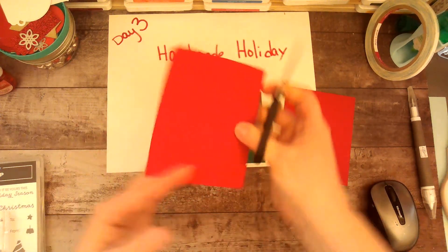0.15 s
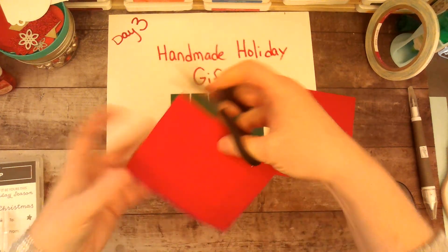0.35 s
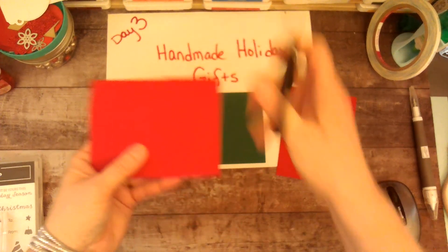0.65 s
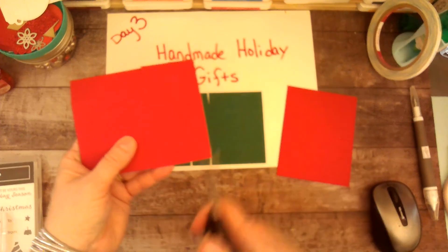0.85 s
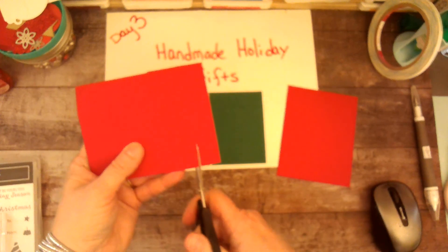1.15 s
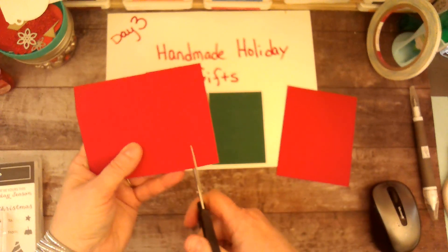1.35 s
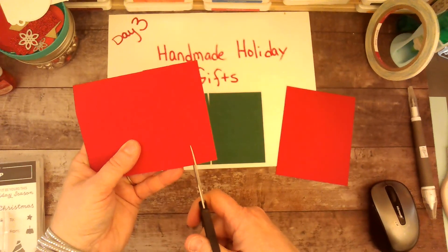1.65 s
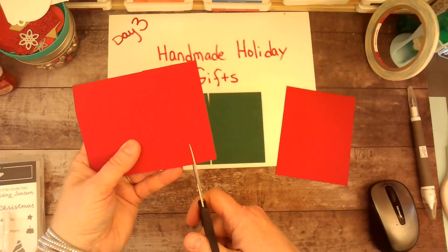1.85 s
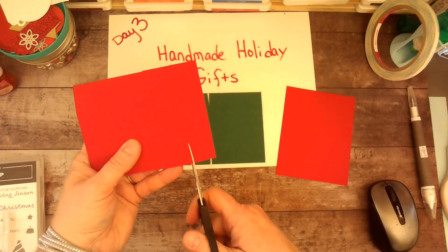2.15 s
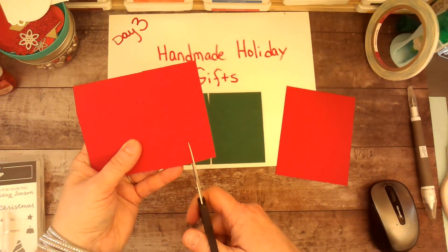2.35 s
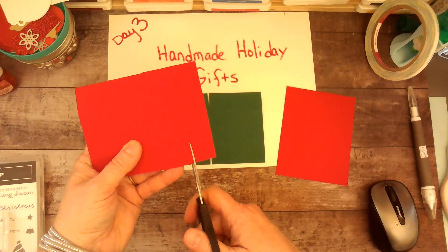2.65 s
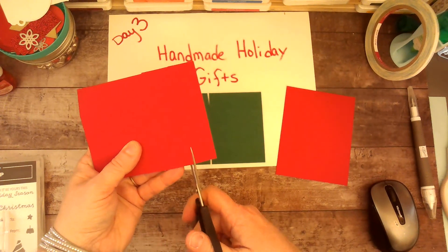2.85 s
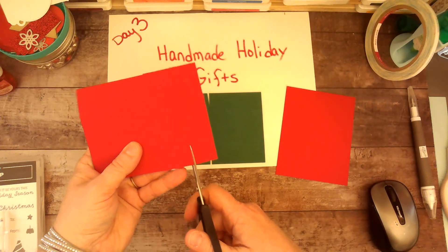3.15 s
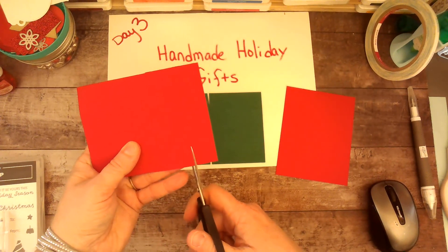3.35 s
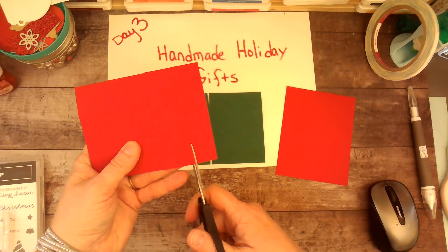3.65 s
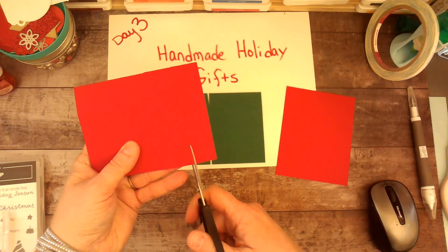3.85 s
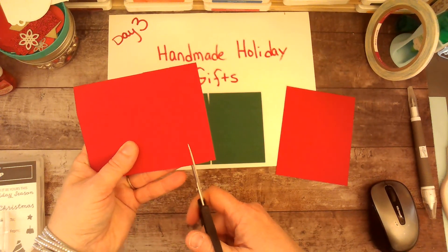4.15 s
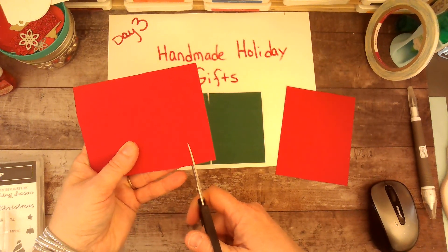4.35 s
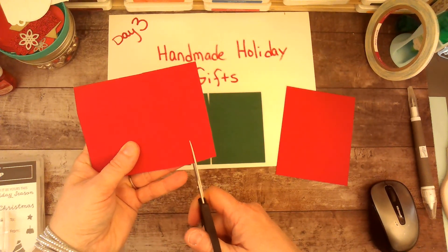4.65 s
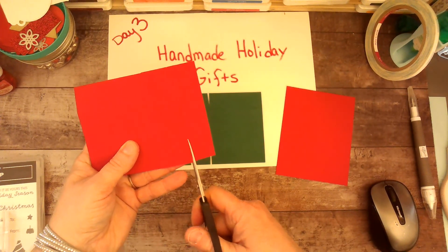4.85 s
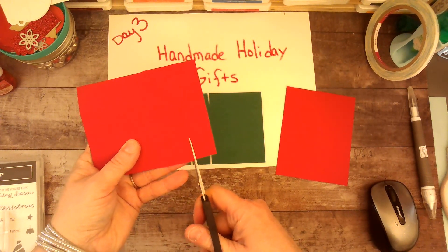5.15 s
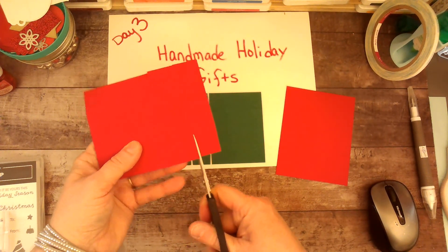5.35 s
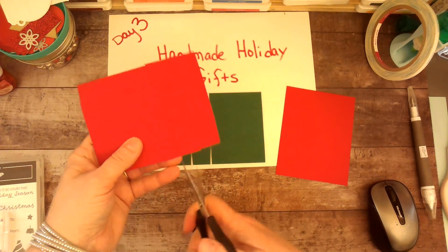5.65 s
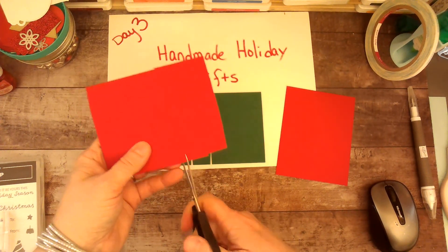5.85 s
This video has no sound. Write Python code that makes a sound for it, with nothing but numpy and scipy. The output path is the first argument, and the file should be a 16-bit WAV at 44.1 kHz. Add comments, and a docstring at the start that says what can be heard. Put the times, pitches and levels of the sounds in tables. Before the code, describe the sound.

Small scissors and stiff card are handled close to the microphone in a small, quiet room, with a low throbbing rumble, soft hiss and a very faint thin whine throughout. In the first 0.7 seconds the card brushes and slides under fingers, the scissors tick twice and bump the sheet. Faint, rapid, even ticks of a small focus motor run from about 0.3 to 1.7 seconds. The card creaks softly at 1.5 seconds. Only faint rubs follow, with a cluster of light taps around 3.2 seconds. From about 4.5 seconds the blades crunch through the card in tiny slips, growing louder and ending in a click just after 5 seconds. The scissors snap shut sharply at 5.3 seconds. At 5.5 seconds the card springs off the blade with a loud, briefly ringing clack, followed by a faint fading rub.

```python
"""A table in a quiet room, small craft scissors cutting stiff card close under the camera's microphone. Fingers
turn and slide the sheet, and it creaks once as a finger shifts on it. The blades bite, crunch through the
fibres in short slips and snap shut; the card flicks free and rings. Each contact is a burst of tiny cracks that
rings steel or card. Behind it: low throbbing room rumble, hiss, a thin whine and the ticks of the lens
focusing."""
import sys
import numpy as np
from scipy import signal
from scipy.fft import rfft, irfft, next_fast_len
from scipy.io import wavfile
from scipy.ndimage import map_coordinates

SR = 44100
rng = np.random.default_rng(int(sys.argv[2]) if len(sys.argv) > 2 else 0)


def digitize_waveform(pressure):
    """Quantize a signal to 16-bit integers and store it at the path in sys.argv[1].

    Rows of a 2-D input are taken as channels; values are limited to [-1, 1].
    """
    field = np.atleast_2d(pressure).T
    bounded = np.clip(field, -1, 1)
    quanta = np.round(bounded * 32767).astype(np.int16)
    wavfile.write(sys.argv[1], SR, quanta)


N = 265041
TOP_HZ = 15900  # upper edge of the microphone's band


# The blades slip through the card. Each row: start in seconds, level in dB, contact length in seconds.
BLADE_SLIPS = [(4.5399, -67, 0.0017), (4.6122, -62, .0029), (4.629, -61, 0.0046), (4.6465, -61, 0.0069),
               (4.6826, -58.5, 0.0046), (4.7045, -60, 0.0013), (4.7095, -52.5, 0.0053),
               (4.729, -64, 0.0044), (4.7385, -60, 0.0038), (4.7458, -60, .0012), (4.7638, -49.5, 0.0014),
               (4.769, -62, 0.0021), (4.774, -57, 0.0011), (4.778, -54, 0.0018), (4.7826, -46.5, .004),
               (4.7958, -58, 0.0015), (4.8182, -50, 0.0057), (4.8412, -49, 0.0049), (4.856, -55, .0012),
               (4.864, -51, .005), (4.872, -41.5, 0.007), (4.8875, -61, 0.0055), (4.9003, -46.5, 0.0032),
               (4.9162, -52.5, .0012)]
# The tips part the last fibres. Each row: start in seconds, level in dB, contact length in seconds.
TIP_CLICKS = [(4.9907, -47, 0.0015), (5.0127, -54, 0.0057), (5.0562, -53, 0.0029), (5.0652, -35.5, 0.006)]
# The scissors in the card. Each row: resonance in Hz, width in Hz, level in dB.
CUTTING_MODES = [(604, 390, -7.5), (700, 280, -5), (1040, 88, -17), (1377, 160, -5.5), (2030, 165, 3),
                 (2820, 280, -0.5), (3680, 325, 8.5), (5250, 470, 0.5), (7040, 870, -5.5),
                 (10300, 2200, -8), (13900, 3400, -6), (15700, 900, 0.5)]
# The steel ringing on. Each row: pitch in Hz, level in dB against the contact, t60 in seconds.
BLADE_RING = [(2057, -2, 0.055), (3010, -11, .04), (3810, -8, .035), (5270, -7, 0.044), (15400, -4, .025)]

def cut():
    """Close to the microphone, the blades stick and slip through the card, then click at the tips."""
    slips = voiced(BLADE_SLIPS, knock_db=-13.5, sparkle_db=-6.5, knock_loss_db=3, sparkle_loss_db=1)
    clicks = voiced(TIP_CLICKS, knock_db=-11, sparkle_db=-0.5, knock_loss_db=2, sparkle_loss_db=2)
    cutting = contacts(slips, CUTTING_MODES, kick=2.5, rattle_db=-13, rattle_t60=0.036,
                       knock_hz=1190, sparkle_hz=6450)
    tips = contacts(clicks, CUTTING_MODES, kick=2.7, rattle_db=-7, rattle_t60=0.047,
                    knock_hz=1170, sparkle_hz=8000)
    tip_ring = struck(TIP_CLICKS, BLADE_RING, attack_s=0.0009)
    slip_ring = amp(-3) * struck(BLADE_SLIPS, BLADE_RING[:1], attack_s=0.001)  # lowest mode only
    return cutting + tips + tip_ring + slip_ring


# Pushes of the blades. Each row: peak time in seconds, level in dB, rise and fall in seconds.
BLADE_PUSHES = [(4.66, -64.5, .03, .06), (4.742, -54, 0.013, 0.019), (4.785, -49.5, 0.013, 0.02),
                (4.872, -55, 0.023, .022), (4.916, -59, .008, .009), (5.002, -51.5, 0.0056, .012)]
# Parting fibres. Each row: frequency in Hz, spectral level in dB.
FIBRE_SPECTRUM = [(530, -57), (900, -26), (1120, -33), (1420, -1), (1590, -23), (2020, -5), (2500, -15),
                  (3640, 1.5), (4680, -7), (5350, -8), (5820, -12), (8000, -13), (10900, -34), (14500, -7),
                  (16000, -12)]
# The rasp of the closing blades. Each row: time in seconds, pitch in Hz.
RASP_PITCH = [(4.65, 7900), (4.921, 10000)]

def crunch(clump_db=2, cracks_per_s=8000, rasp_db=-13.5, rasp_width_hz=700):
    """Fibres part in clumps of cracks; a thin rasp rises as the blades' crossing runs to the tips."""
    clumps = amp(clump_db * wobble(250))
    cracks = crackle(cracks_per_s)
    rasp_hz = np.interp(np.arange(N) / SR, *np.transpose(RASP_PITCH))
    band = filtered(cracks, lambda hz: np.exp(-0.5 * (hz / rasp_width_hz) ** 2))
    rasp = unit(band * np.cos(2 * np.pi * np.cumsum(rasp_hz) / SR))
    return swells(BLADE_PUSHES) * clumps * (coloured(cracks, FIBRE_SPECTRUM) + amp(rasp_db) * rasp)


# The catch and the snap. Each row: start in seconds, level in dB, contact length in seconds.
CLOSING_SNAPS = [(5.286, -49.5, 0.0031), (5.3017, -30, 0.00091)]
# The closed scissors. Each row: resonance in Hz, width in Hz, level in dB.
SHUT_MODES = [(373, 70, -5.5), (620, 90, -9.5), (790, 106, -2.5), (1020, 63, -4), (1430, 220, -8),
              (2020, 130, 1), (2930, 300, 6), (3600, 550, 5), (5200, 540, 0.5), (6930, 1050, -2),
              (10300, 2400, -5.5), (15200, 1400, 0.5)]
# Blade sliding on blade. Each row: peak time in seconds, level in dB, rise and fall in seconds.
BLADE_SLIDES = [(5.314, -53, .003, .005)]
# The sizzle of that slide. Each row: frequency in Hz, spectral level in dB.
SIZZLE_SPECTRUM = [(9000, -40), (12500, -12), (13900, 0), (15600, 0), (16500, -10)]

def snap_shut():
    """The scissors catch and snap shut, and the blades slide on each other with a thin sizzle."""
    snaps = voiced(CLOSING_SNAPS, knock_db=-13.2, sparkle_db=0.8, knock_loss_db=-2.5, sparkle_loss_db=4)
    shut = contacts(snaps, SHUT_MODES, kick=9, rattle_db=-4.5, rattle_t60=0.02,
                    knock_hz=1190, sparkle_hz=6500)
    sizzle = swells(BLADE_SLIDES) * coloured(rng.standard_normal(N), SIZZLE_SPECTRUM)
    return shut + sizzle


# Ticks of the loose scissors. Each row: start in seconds, level in dB.
PIVOT_TICKS = [(.0868, -45), (.1972, -41)]
# Their ring. Each row: pitch in Hz, level in dB against the tick, t60 in seconds.
PIVOT_RING = [(2110, -13.5, .045), (3390, 0, .015), (3940, -8, .012)]

def pivot():
    """The loose scissors tick in the hand and ring briefly."""
    return struck(PIVOT_TICKS, PIVOT_RING, attack_s=0.0002)


# The card leaves the blade. Each row: start in seconds, level, knock and sparkle in dB, length in seconds.
CARD_FLICKS = [(5.5224, -31.5, -17, -9.5, 0.0056), (5.529, -38.5, -14, -10, .007),
               (5.5362, -35.5, -7, -11, .003), (5.5399, -25.5, -23.5, -7.5, 0.0014),
               (5.571, -50.5, -4, -9, .0057)]
# The springing sheet. Each row: resonance in Hz, width in Hz, level in dB.
SPRINGING_MODES = [(180, 63, -7), (295, 83, 1.5), (370, 86, 3), (462, 67, -1.5), (634, 70, -8),
                   (810, 99, -5), (1520, 960, -8), (2140, 250, 4.5), (3030, 280, 6), (3680, 270, 7),
                   (5160, 250, 4), (5620, 330, 1), (6300, 760, -3.5), (9500, 1100, -11), (15400, 720, -8.5)]
# The freed sheet ringing on. Each row: pitch in Hz, level in dB, t60 in seconds.
FREED_RING = [(300, -57, 0.29), (430, -53, .07), (827, -37.5, 0.062), (2230, -42, .05), (3006, -39, .05),
              (3660, -42, .06), (5060, -37, .055), (5615, -43, .06)]

def card_flick(release_s=5.5405):
    """Just under the microphone, the stiff sheet springs off the blade, clacks and rings on."""
    clack = contacts(CARD_FLICKS, SPRINGING_MODES, kick=6.7, rattle_db=-5.5, rattle_t60=0.044,
                     sparkle_hz=7400)
    return clack + struck([(release_s, 0)], FREED_RING, attack_s=0.002)


# Taps on the card. Each row: start in seconds, then level, knock and sparkle in dB.
CARD_TAPS = [(0.0756, -56, -6, -1), (0.0852, -54.5, 0, 0), (.1967, -56.5, -3, 1), (.5345, -55.5, -10, -2),
             (.5395, -58, -6, -7), (0.5865, -59.5, -7, -4), (.617, -62, -12, -3), (1.115, -62, -3, -5),
             (3.142, -58, -4, 0), (3.145, -50, 2.5, -2), (3.1591, -51.5, -7, 1.5), (3.196, -55, -1, -5),
             (3.2174, -57, -3, -3), (3.2653, -59, 3, 0), (3.2946, -56.5, -3, -1)]
# The sheet damped by the fingers. Each row: resonance in Hz, width in Hz, level in dB.
HELD_MODES = [(168, 86, 0), (356, 143, 2.5), (820, 160, -1), (1500, 320, -1), (2080, 130, 3.5),
              (2720, 240, 1), (3770, 440, 3), (5340, 300, 3), (7660, 1800, -14.5), (15000, 2400, -16)]

def card_taps(contact_s=0.003):
    """Fingers and blade knock softly on the held sheet."""
    taps = [(*row, contact_s) for row in CARD_TAPS]
    return contacts(taps, HELD_MODES, kick=8.8, rattle_db=-1, rattle_t60=0.036, sparkle_hz=4470)


# The bending sheet. Each row: resonance in Hz, width in Hz, level in dB.
BENT_MODES = [(390, 74, -3), (794, 120, 1), (2020, 250, -3), (3300, 1500, -10), (7160, 900, -14)]

def card_creak(start_s=1.54, level_db=-52.5, knock_db=-10, sparkle_db=-13, length_s=0.046):
    """The card creaks once as a finger shifts on it."""
    bend = [(start_s, level_db, knock_db, sparkle_db, length_s)]
    return contacts(bend, BENT_MODES, kick=0, rattle_db=-9, rattle_t60=0.08)


# The ring of scissors bumping card. Each row: pitch in Hz, level in dB, t60 in seconds.
BUMP_RING = [(328, -45, 0.047), (383, -57.5, 0.3), (397, -38, 0.026), (950, -49.5, 0.03),
             (1920, -42, 0.023), (2730, -35, 0.023), (3070, -36, .014), (3440, -35, 0.019),
             (3640, -40, 0.019), (4290, -50, 0.016), (5320, -46, 0.023), (6600, -52, 0.012),
             (15200, -42, .006)]

def bump(start_s=0.4436, crack_db=-42, crack_t60=0.013):
    """The scissors bump the sheet as it is turned: a tight low tap, a quick bright ring and a crack."""
    t = np.arange(SR // 20) / SR
    out = struck([(start_s, 0)], BUMP_RING, attack_s=0.00024)
    add(out, start_s, amp(crack_db - 60 * t / crack_t60) * rng.standard_normal(len(t)))
    return out


# Strokes on the card. Each row: peak time in seconds, level and treble in dB, rise and fall in seconds.
STROKES = [(.036, -49.5, 1, 0.002, .014), (.066, -55.5, 2.5, 0.017, .057), (.151, -52.5, 5, .025, 0.024),
           (.178, -47.5, -1, 0.0048, .0035), (.26, -60.5, 0, .021, .057), (.433, -48.5, -5, 0.0042, 0.0073),
           (0.465, -44, -4, 0.0023, .004), (.486, -43.5, 1.5, 0.013, .023), (.56, -55, -1.5, 0.055, 0.14),
           (.675, -64, 0, .004, 0.015), (1.122, -57.5, 2.5, 0.0057, 0.019), (1.32, -58.5, -5, .0047, .0073),
           (1.421, -56.5, -2, .0033, .006), (1.903, -62.5, -4, .008, 0.016), (2.2, -61, -9, .006, .012),
           (2.38, -62, -8, .0073, 0.011), (3.06, -64.5, -3, .05, .091), (3.555, -63, -4, 0.01, 0.022),
           (4.235, -62, -9, .0095, .012), (5.262, -57, 0, .0045, .0088), (5.415, -56.5, -2, 0.031, .028),
           (5.72, -65.5, -2, .043, .23)]
# Rubbed card. Each row: frequency in Hz, spectral level in dB.
RUB_SPECTRUM = [(290, -56), (500, -8), (1280, -11), (1740, -1), (2230, -3), (2730, 2.5), (3150, 0.5),
                (3810, 5.5), (4340, -6), (5250, 4.5), (6100, -3), (10800, -14.5), (13500, -9), (15100, -3),
                (16000, -0.5)]

def brushes(grains_per_s=5000, treble_hz=4900):
    """Fingers and blade slide over the card, each stroke a grainy hiss with its own share of treble."""
    grains = crackle(grains_per_s)
    hiss = amp(1.3 * wobble(120)) * coloured(grains, RUB_SPECTRUM)
    treble = filtered(hiss, lambda hz: 1 - 1 / (1 + (hz / treble_hz) ** 6))
    low_gain = swells([(s, db, rise, fall) for s, db, _, rise, fall in STROKES])
    treble_gain = swells([(s, db + treble_db, rise, fall) for s, db, treble_db, rise, fall in STROKES])
    return low_gain * (hiss - treble) + treble_gain * treble


# Runs of the lens. Each row: start in seconds, number of ticks, motor steps from tick to tick.
FOCUS_RUNS = [(.2588, 10, 2), (.9668, 19, 1), (1.7098, 1, 1)]

def lens(step_s=0.0373, tick_hz=3900, width_s=0.00014, bounce_s=0.000566, bounce_share=0.35):
    """In the camera itself, the focus motor ticks on a steady clock, each tick with one small rebound."""
    out = np.zeros(N)
    t = np.arange(SR // 500) / SR - 0.0005  # zero at the tick's peak
    blip = lambda u: np.exp(-0.5 * (u / width_s) ** 2) * np.cos(2 * np.pi * tick_hz * u)
    tick = blip(t) + bounce_share * blip(t - bounce_s)
    for s, count, stride in FOCUS_RUNS:
        for k in range(int(count)):
            add(out, s + k * stride * step_s, amp(-46 + rng.normal(0, 0.7)) * tick)
    return out


# The room's decay. Each row: frequency in Hz, t60 in seconds.
ROOM_DECAY = [(200, 0.26), (1000, 0.18), (4000, 0.24), (8000, 0.2), (15000, 0.16)]
# What the walls send back. Each row: frequency in Hz, spectral level in dB.
WALL_SPECTRUM = [(150, -5.5), (1000, 1), (2200, -6.5), (3700, -8.5), (5200, -4.5), (7500, -9), (15000, -7)]

def room(x, delay_s=0.006):
    """The walls of the small room answer at the microphone with a short diffuse tail."""
    hz, t, noise = signal.stft(rng.standard_normal(SR // 2), SR, nperseg=256)
    tail_db = along(WALL_SPECTRUM, hz)[:, None] - 60 * t / along(ROOM_DECAY, hz)[:, None]
    tail = signal.istft(noise * amp(tail_db), SR, nperseg=256)[1]
    response = np.pad(tail / np.linalg.norm(tail), (round(delay_s * SR), 0))
    return signal.fftconvolve(x, response)[:N]


# The room's rumble. Each row: frequency in Hz, spectral level in dB.
RUMBLE_SPECTRUM = [(8, -41), (18, -6.5), (30, 0.5), (38, -0.5), (48, -10.5), (70, -14), (95, -17),
                   (130, -22), (200, -28), (300, -33), (600, -87)]
# Its throb. Each row: pitch in Hz, level in dB against the rumble, wander in Hz.
THROB_TONES = [(11.55, 19, 0.42), (39.4, -7, 1)]
# Lulls in both. Each row: centre in seconds, level change in dB, half length in seconds.
RUMBLE_LULLS = [(1.25, -8, 0.2), (5.228, -7, 0.15)]
# The steady hiss. Each row: frequency in Hz, spectral level in dB.
HISS_SPECTRUM = [(60, -9), (120, 3), (240, -4.5), (350, -1), (528, -6), (645, -6), (828, -8), (2570, -12.5),
                 (2840, -12), (3830, -12.5), (4020, -8), (4440, -13), (13500, -15.5), (15200, -9.5),
                 (16000, -14.5)]

def room_tone(rumble_db=-54.5, hiss_db=-64, whine_hz=4160, whine_db=-75):
    """Behind the table, rumble and throb ease twice together, under steady hiss and a thin whine."""
    t = np.arange(N) / SR
    lull_db = sum(db * np.exp(-0.5 * ((t - s) / half) ** 2) for s, db, half in RUMBLE_LULLS)
    throb = sum(amp(db) * tone(hz, wander_hz) for hz, db, wander_hz in THROB_TONES)
    rumble = amp(3.2 * wobble(11)) * coloured(rng.standard_normal(N), RUMBLE_SPECTRUM)
    whine = amp(whine_db) * tone(whine_hz, wander_hz=0.67)
    hiss = amp(hiss_db) * coloured(rng.standard_normal(N), HISS_SPECTRUM)
    return amp(rumble_db + lull_db) * (throb + rumble) + whine + hiss


def contacts(rows, modes, kick, rattle_db, rattle_t60, knock_hz=600, sparkle_hz=7000):
    """A kick, cracks and a dying rattle ring a body; knock (lows) and sparkle (highs) are dB re mids."""
    out, t = np.zeros(N), np.arange(SR // 8) / SR
    ring = body(modes, t)
    edges = [(100, knock_hz), (knock_hz, sparkle_hz), (sparkle_hz, TOP_HZ)]
    bands = [signal.butter(3, edge, "band", fs=SR, output="sos") for edge in edges]
    spread = np.sqrt(SR // 200 / len(t))  # the level counts the mids' energy as if packed into 5 ms
    for s, db, knock_db, sparkle_db, length in rows:
        cracks = rng.standard_normal(len(t)) * np.exp(-(t / length) ** 4)
        cracks[0] += kick
        rattle = rng.standard_normal(len(t)) * amp(-60 * t / rattle_t60)
        sound = signal.fftconvolve(unit(cracks) + amp(rattle_db) * unit(rattle), ring)[:len(t)]
        for band, band_db in zip(bands, [knock_db, 0, sparkle_db]):
            add(out, s, spread * amp(db + band_db) * unit(signal.sosfilt(band, sound)))
    return out


def voiced(rows, knock_db, sparkle_db, knock_loss_db, sparkle_loss_db):
    """Give contacts knock and sparkle: the values at 1 ms, less a loss for each doubling of length."""
    s, db, length = np.transpose(rows)
    doublings = np.log2(length / 0.001)
    knock = knock_db - knock_loss_db * doublings
    sparkle = sparkle_db - sparkle_loss_db * doublings
    return np.transpose([s, db, knock, sparkle, length])


def body(modes, t):
    """The ring of (Hz, width, dB) resonances; card and fingers damp each within a few cycles."""
    hz, width, db = np.transpose(modes)[:, :, None]
    width = np.maximum(width, 50 + hz / 24)
    signs = np.resize([1, -1], hz.shape)
    decays = amp(db) * width * np.exp(-np.pi * width * t)
    return np.sum(signs * decays * np.cos(2 * np.pi * hz * t), axis=0)


def struck(rows, modes, attack_s):
    """Blows (s, dB) each set the (Hz, dB, t60) modes ringing."""
    out, t = np.zeros(N), np.arange(SR // 4) / SR
    ring = sum(amp(db - 60 * t / t60) * np.sin(2 * np.pi * hz * t) for hz, db, t60 in modes)
    for s, db, *_ in rows:
        add(out, s, amp(db) * (1 - np.exp(-t / attack_s)) * ring)
    return out


def swells(rows):
    """Gain over time of strokes that build smoothly to a peak and then die away."""
    t, power = np.arange(N) / SR, np.full(N, 1e-14)
    for s, db, rise, fall in rows:
        shape = np.exp(np.where(t < s, -0.5 * ((t - s) / rise) ** 2, (s - t) / fall))
        power += (amp(db) * shape) ** 2
    return np.sqrt(power)


def crackle(per_s):
    """Impulses of random time and size."""
    return (rng.random(N) < per_s / SR) * rng.standard_normal(N)


def tone(hz, wander_hz):
    """A sine at rms 1 whose pitch wanders."""
    return np.sqrt(2) * np.sin(2 * np.pi * np.cumsum(hz + wander_hz * wobble(4.3)) / SR)


def wobble(rate):
    """A smooth random curve, rate knots a second."""
    return map_coordinates(rng.standard_normal(int(N * rate / SR) + 4), [np.arange(N) * rate / SR])


def coloured(x, spectrum):
    """x given a spectrum, at rms 1."""
    return unit(filtered(x, lambda hz: amp(along(spectrum, hz))))


def filtered(x, response):
    """x through a frequency response."""
    size = next_fast_len(len(x) + SR // 4)
    return irfft(rfft(x, size) * response(np.fft.rfftfreq(size, 1 / SR)), size)[:len(x)]


def along(points, hz):
    """(Hz, value) points read on a log axis."""
    point_hz, values = np.transpose(points)
    return np.interp(np.log(hz + 1), np.log(point_hz + 1), values)


def amp(db):
    """Decibels to gain."""
    return 10 ** (np.asarray(db) / 20)


def unit(x):
    """Scale to rms 1."""
    return x / np.sqrt(np.mean(x ** 2) + 1e-20)


def add(track, s, sound):
    """Mix a sound in at time s."""
    part = track[max(round(s * SR), 0):][:len(sound)]
    part += sound[:len(part)]


def scene(room_db=-15):
    """One microphone: scissors and card up close, each with its own faint tail, over lens and room tone."""
    scissors = cut() + snap_shut() + pivot() + crunch()
    card = card_taps() + card_creak() + card_flick() + bump() + brushes()
    handiwork = sum(source + amp(room_db) * room(source) for source in [scissors, card])
    return (handiwork + lens() + room_tone())[None]


def record(dry):
    """The camera's microphone keeps nothing above its band limit."""
    return signal.sosfilt(signal.cheby2(14, 60, TOP_HZ + 700, fs=SR, output="sos"), dry)


dry = scene()
out = record(dry)
digitize_waveform(out)
```